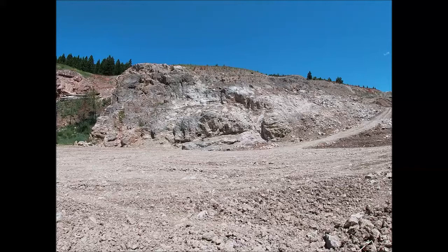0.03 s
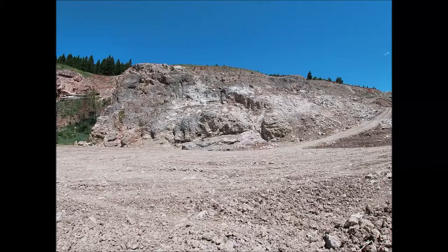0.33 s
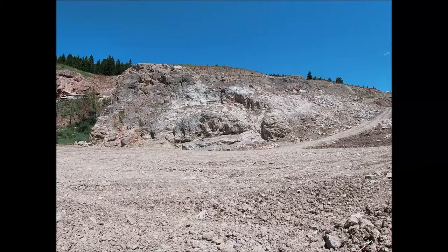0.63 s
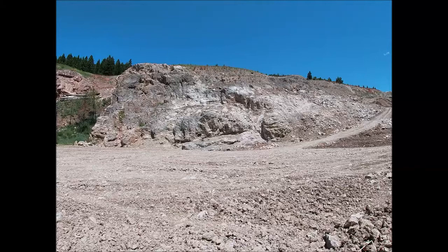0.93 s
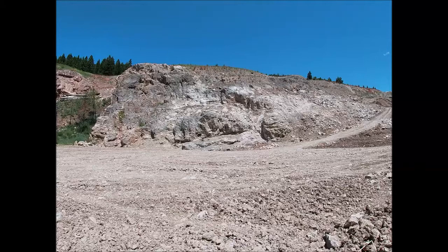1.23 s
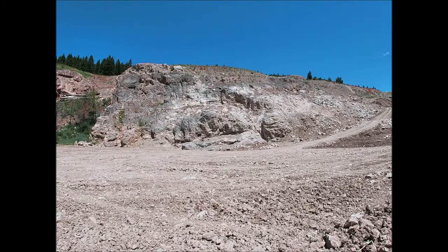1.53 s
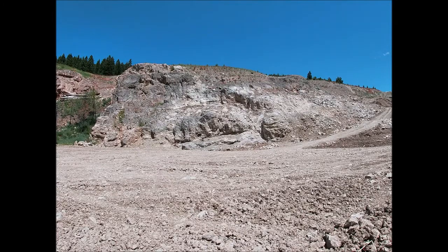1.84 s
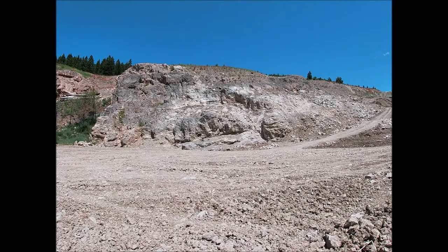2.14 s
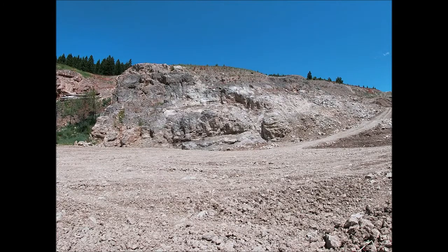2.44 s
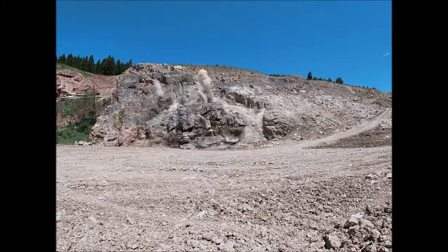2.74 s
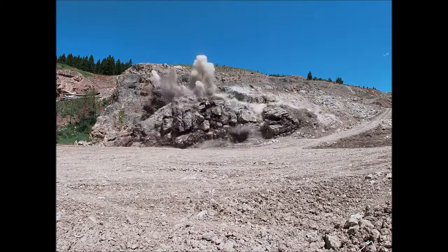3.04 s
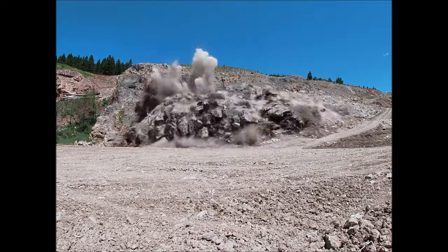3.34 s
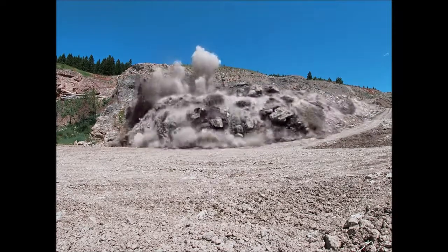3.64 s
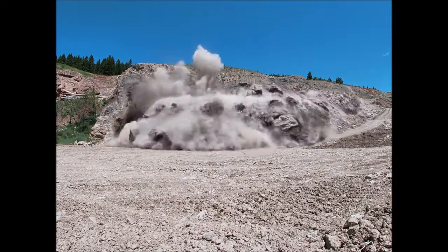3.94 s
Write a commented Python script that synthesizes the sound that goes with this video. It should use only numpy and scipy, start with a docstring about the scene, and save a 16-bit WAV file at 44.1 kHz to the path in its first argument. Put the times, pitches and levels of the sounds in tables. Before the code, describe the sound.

Explosive charges fire in a fast, crackling string across a quarry face, after a quiet stretch of wind on the microphone. Their echoes merge into a roar above a heavy rumble, followed by a growing clatter of falling rock.

```python
"""In an open quarry, wind buffets a microphone over a faint hiss; then a row of charges fires.
Each charge sends out a shock wave, heard as a sharp crack, and escaping gas adds low thumps.
Reflections from the walls merge into a roar. The moving rock mass rumbles on,
while broken stone starts to pour down in a thickening stream of impacts."""
import sys
import numpy as np
from scipy import signal
from scipy.fft import rfft, irfft
from scipy.io import wavfile
from scipy.ndimage import uniform_filter1d

SR = 44100
rng = np.random.default_rng(int(sys.argv[2]) if len(sys.argv) > 2 else 0)


def inscribe(sig):
    """Save sig as 16-bit PCM at rate SR to the path in sys.argv[1].

    A 1-D sig is mono; a 2-D sig holds one channel per row.
    Samples are clipped to [-1, 1] before scaling.
    """
    pcm = np.round(np.clip(np.atleast_2d(sig).T, -1, 1) * 32767)
    wavfile.write(sys.argv[1], SR, pcm.astype(np.int16))


N = 176400
TIME, FREQ_HZ = np.arange(N) / SR, np.fft.rfftfreq(N, 1 / SR)
START_S = .094  # the sound cuts in here


def amp(db):
    """Decibels as an amplitude ratio."""
    return 10 ** (np.asarray(db) / 20)

def unit(x):
    """Normalisation to rms 1."""
    return x / np.sqrt(np.mean(x ** 2) + 1e-20)

def spectrum_db(points, hz):
    """Interpolation of a spectrum on a log-frequency axis."""
    f, db = np.transpose(points)
    return np.interp(np.log(hz + 1), np.log(f + 1), db)

def curve(points, at_s=TIME):
    """Linear interpolation in time."""
    return np.interp(at_s, *np.transpose(points))

def add(mix, start_s, sound):
    """Superposition of a sound on the mix."""
    part = mix[max(round(start_s * SR), 0):][:len(sound)]
    part += sound[:len(part)]

def colour(x, points):
    """Spectral shaping, at rms 1."""
    return unit(irfft(rfft(x) * amp(spectrum_db(points, FREQ_HZ)), N))

def steady(x, span_s):
    """Division by the running rms evens out chance swells."""
    power = uniform_filter1d(x ** 2, int(span_s * SR))
    return x / np.sqrt(abs(power) + 1e-6)

def noise(points):
    """Filtered Gaussian noise."""
    return colour(rng.standard_normal(N), points)

def grains(per_s, spread_db):
    """A Poisson stream of impulses, many small and a few large."""
    size = amp(spread_db * np.minimum(rng.exponential(1, N), 4.5)) * rng.choice([-1, 1], N)
    return unit(size * (rng.random(N) < per_s / SR))


# Spectrum of the hiss. Each row: frequency in Hz, relative level in dB.
HISS_SPECTRUM = [(100, 9), (400, 2), (900, 0.5), (1700, -0.5), (4700, -5.5), (6300, -14), (8500, -14.5),
                 (10200, -16.5), (11300, -36), (16000, -44)]

def hiss(level_db=-46.5):
    """Distant air and trees give stationary broadband noise."""
    return amp(level_db) * noise(HISS_SPECTRUM)


def ring(hz=1175, width_hz=70, level_db=-48.5, fade_db_per_s=32):
    """A faint tone in a narrow band of noise decays exponentially."""
    band = irfft(rfft(rng.standard_normal(N)) / (1 + ((FREQ_HZ - hz) / width_hz) ** 2), N)
    tone = unit(np.sin(2 * np.pi * hz * TIME) + unit(band))
    return amp(level_db - fade_db_per_s * (TIME - START_S)) * tone


# Strength of the wind. Each row: time in seconds, relative level in dB.
WIND_STRENGTH = [(.09, -21), (.2, -20.5), (.38, -19.5), (.56, -23), (.66, -20), (.82, -25), (.96, -32),
                 (1.08, -26), (1.39, -32.5), (1.49, -41), (1.70, -35.5), (1.74, -47), (1.80, -48),
                 (1.85, -30), (2.01, -31.5), (2.05, -41.5), (2.5, -29)]
# Spectra of the large and the small eddies. Each row: frequency in Hz, relative level in dB.
LARGE_EDDY_SPECTRUM = [(10, -1), (30, 3), (70, 2), (120, -4), (200, -14), (350, -42.5), (800, -67),
                       (2000, -86)]
SMALL_EDDY_SPECTRUM = [(30, -32), (100, 1), (180, 3.5), (260, -9.5), (380, -19), (700, -38), (2000, -78)]

def wind():
    """Turbulence at the microphone: small, higher eddies grow faster in a gust than large, deep ones."""
    gust_db = curve(WIND_STRENGTH) + 20  # about 0 in the strongest gusts
    large = amp(-23 + .7 * gust_db) * steady(noise(LARGE_EDDY_SPECTRUM), span_s=.091)
    small = amp(-23.5 + 2.07 * gust_db) * steady(noise(SMALL_EDDY_SPECTRUM), span_s=.034)
    return large + small


# Knocks of air. Each row: centre in seconds, level in dB, half length in seconds, band top in Hz.
WIND_BUFFETS = [(0.33, -22, 0.0087, 344), (0.436, -21.5, 0.0082, 319), (0.88, -31, 0.006, 380),
                (1.432, -29.5, 0.0074, 138), (1.555, -22, 0.011, 70), (1.595, -24.5, 0.0061, 121),
                (1.645, -31, 0.013, 173), (1.944, -30, 0.01, 64)]

def buffets():
    """Each buffet is a brief pressure fluctuation, a dull knock with its own length and pitch band."""
    out = np.zeros(N)
    for centre_s, db, half_s, top_hz in WIND_BUFFETS:
        band = signal.butter(2, [.2 * top_hz, top_hz], "band", fs=SR, output="sos")
        push = np.exp(-((TIME - centre_s) / half_s) ** 2 / 2)
        eddy = push * signal.sosfilt(band, signal.sosfilt(band, rng.standard_normal(N)))
        out += amp(db) * eddy * np.linalg.norm(push) / np.linalg.norm(eddy)
    return out


# Growth of the rockfall. Each row: time in seconds, level of the stones in dB.
FALL_ENVELOPE = [(2.9, -79), (3.3, -48), (3.5, -37), (3.65, -34), (3.85, -29.5), (4.0, -28.5)]
# Spectra of stones and boulders. Each row: frequency in Hz, relative level in dB.
STONE_SPECTRUM = [(60, -12), (170, 11), (350, 5), (700, -0.5), (1500, 2.5), (3000, 0.5), (4700, -4),
                  (5800, -14.5), (8200, -25.5), (10000, -27.5), (11500, -36.5), (14000, -53), (16000, -57)]
BOULDER_SPECTRUM = [(20, -11), (70, 1), (150, 6.5), (260, -7), (500, -20), (1500, -66)]

def rockfall(boulder_db=6.5):
    """Random impacts add up to shot noise: stones clatter and boulders knock dully."""
    stones = colour(grains(per_s=10000, spread_db=1.5), STONE_SPECTRUM)
    boulders = steady(colour(grains(per_s=250, spread_db=3), BOULDER_SPECTRUM), span_s=.063)
    return amp(curve(FALL_ENVELOPE)) * (stones + amp(boulder_db) * boulders)


# Course of the rumble. Each row: time in seconds, level in dB.
RUMBLE_ENVELOPE = [(2.22, -90), (2.3, -35), (2.44, -43), (2.5, -17), (2.75, -20), (2.9, -15), (3.2, -14.5),
                   (3.37, -21), (3.55, -22.5), (3.72, -15.5), (4.0, -19)]
# Its spectrum. Each row: frequency in Hz, relative level in dB.
RUMBLE_SPECTRUM = [(10, -12.5), (28, -0.5), (60, -6), (110, -13.5), (200, -21), (350, -49), (800, -41),
                   (2000, -100)]

def rumble():
    """The moving rock mass radiates low-frequency noise."""
    return amp(curve(RUMBLE_ENVELOPE)) * steady(noise(RUMBLE_SPECTRUM), span_s=.0563)


# Course of the roar. Each row: time in seconds, level in dB.
ROAR_ENVELOPE = [(2.225, -63), (2.24, -45), (2.30, -42), (2.37, -34), (2.43, -33), (2.50, -30.5),
                 (2.56, -21), (2.605, -28.5), (2.65, -26), (2.75, -26), (2.88, -38), (3.0, -36),
                 (3.25, -40), (4.0, -51)]
# Its spectrum. Each row: frequency in Hz, relative level in dB.
ROAR_SPECTRUM = [(60, -4), (300, 1.5), (900, -0.5), (1800, -4.5), (3200, -9.5), (4500, -17), (6000, -22.5),
                 (8000, -38), (9800, -35.5), (11500, -58), (16000, -66)]

def roar():
    """Reverberation: countless small echoes from the quarry walls merge into noise."""
    return amp(curve(ROAR_ENVELOPE)) * colour(grains(per_s=12000, spread_db=3), ROAR_SPECTRUM)


# Bursts of gas. Each row: centre in seconds, relative level in dB, half length in milliseconds.
GAS_BURSTS = [(2.23, -16, 1.18), (2.2631, -16.5, 1.33), (2.2911, -14, 1.16), (2.32, -13.5, 1.14),
              (2.3503, -5.5, 1), (2.445, -17.5, 1.2), (2.4708, -13.5, 1.23), (2.4913, -15, 0.99),
              (2.5005, -13, 3), (2.5739, -2, 2.28), (2.588, -1.5, 1.57), (2.6337, -8, 1.7),
              (2.6716, -3.5, 1.66), (2.704, -3, 2.3), (2.7468, -6.5, 1.44), (2.7965, -6, 3.6),
              (2.829, -10.5, 4), (2.9325, -13, 2.1), (2.9524, -12.5, 3.9), (2.9977, -12, 3.8),
              (3.0334, -11, 3.8), (3.156, -10.5, 2.5), (3.1905, -13.5, 3), (3.203, -10.5, 2.3),
              (3.2338, -10.5, 6.4), (3.2918, -7.5, 2.37), (3.399, -10.5, 4.7), (3.4489, -9, 5.1),
              (3.491, -9, 5.5), (3.6167, -11.5, 5.5)]
# Spectrum of the rushing gas. Each row: frequency in Hz, relative level in dB.
GAS_SPECTRUM = [(100, -12), (300, -14), (600, -2.5), (1200, -19), (3000, -20), (8000, -46), (16000, -84)]

def thumps(pulse_db=.5, edge_db=-9, rush_db=-10.5):
    """Expanding gas radiates a bipolar pulse, a push and then a longer suction, with a rush of noise."""
    suction_ratio, edge_ratio = 1.35, .37  # lengths: suction to push, steep middle to whole pulse
    pulses, rush = np.zeros(N), np.zeros(N)
    t = np.arange(-SR // 40, SR // 40) / SR
    for centre_s, db, half_ms in GAS_BURSTS:
        u = t * 1000 / half_ms  # time in half lengths
        u_body, u_edge = u / suction_ratio ** (np.sign(u) / 2), u / edge_ratio
        body = -u_body * np.exp((1 - u_body ** 2) / 2)
        edge = -u_edge * np.exp((1 - u_edge ** 2) / 2)
        add(pulses, centre_s + t[0], amp(db) * (body + amp(edge_db) * edge))
        add(rush, centre_s + t[0], amp(db) / half_ms * np.exp(-(u + 1) ** 2 / 2))
    return amp(pulse_db) * pulses + amp(rush_db) * rush * noise(GAS_SPECTRUM)


def scatter(decay_s, first_return_s=.0004, cutoff_hz=6240, size=3000):
    """Diffuse scattering: rough rock returns a gritty cloud of duller reflections, with energy 1."""
    t = np.arange(size) / SR
    grit = rng.standard_normal(size) * rng.exponential(1, size)
    cloud = grit * np.exp(-t / decay_s) * (t > first_return_s)
    cloud = signal.lfilter(*signal.butter(1, cutoff_hz, fs=SR), cloud)
    return cloud / np.linalg.norm(cloud)


# Spectrum of one shock. Each row: frequency in Hz, relative level in dB.
SHOCK_SPECTRUM = [(60, -9.5), (400, 0), (1000, 2), (2200, -2), (4400, -13.5), (5500, -20.5), (8200, -30),
                  (9800, -30.5), (11500, -49), (14200, -54), (16000, -81)]

def shock(tilt_db_per_octave, size=2048):
    """A shock wave as a minimum-phase pulse: a pressure spike, then suction, with energy 1."""
    hz = abs(np.fft.fftfreq(size, 1 / SR))
    octaves = np.log2(np.maximum(hz, 500) / 2000)
    log_gain = np.log(amp(spectrum_db(SHOCK_SPECTRUM, hz) + tilt_db_per_octave * octaves))
    spectrum = np.exp(np.conj(signal.hilbert(log_gain)))
    wave = np.fft.ifft(spectrum).real[:size // 2]
    return wave / np.linalg.norm(wave)


# Floor bounce as the firing moves along the face. Each row: time in seconds, delay in seconds.
BOUNCE_DELAY = [(2.23, .00097), (2.9, .0011), (3.2, .00063)]
# Shocks of the charges, plus a few very dull rows (near 2.570 and 3.286 s) that give short low knocks inside
# the thumps. Each row: start in seconds, relative level in dB, tilt in dB per octave.
CHARGES = [(2.2282, 11, 7), (2.261, -9.5, 2), (2.2884, -6, 4), (2.3173, 2, 2), (2.3453, -7, 1),
           (2.3469, 1.5, 3.3), (2.3781, -5, 3.5), (2.382, 3.5, 2.5), (2.4061, 2.5, 0.5), (2.413, 0.5, 5),
           (2.4374, 2, 3), (2.4423, 2.5, 0.5), (2.4671, 2.5, 1.5), (2.4679, -9, -15), (2.4739, -3, 0.4),
           (2.4984, -3, 3), (2.503, 0.5, -1), (2.5277, -1, 0.5), (2.541, -1.5, 1), (2.5547, 0, 0.5),
           (2.5700, 4, -11), (2.5853, -3.5, -3), (2.628, 2.5, -0.5), (2.6677, 4.5, -9.5), (2.6975, -5, 1),
           (2.7147, -1, 0), (2.727, 1, 1), (2.7592, 0.5, 0), (2.7933, -0.5, 0.5), (2.8269, -2.5, 0.5),
           (2.8567, 0, 1), (2.8796, -5, 0.5), (2.8829, -10.5, 7.5), (2.9037, 0, -1.5), (2.9097, -3.5, 2.5),
           (2.942, -6, 1.2), (2.9638, -6, 1), (2.9743, -9.5, 2), (2.995, -4.5, -0.2), (3.0135, -8.5, -2.5),
           (3.0485, -9, 2), (3.081, -6.5, 1.3), (3.091, -10.5, 1.5), (3.11, -5, -3), (3.144, -5, 0),
           (3.231, -0.5, 2), (3.2859, -4, -11)]

def cracks(gain_db=5, rubble_db=-9, face_db=-10.5, bounce_gain=.5):
    """Multipath: each shock arrives directly, scattered by rubble and rock face, and off the floor."""
    out = np.zeros(N)
    for start_s, db, tilt in CHARGES:
        paths = amp(rubble_db) * scatter(decay_s=.0011) + amp(face_db) * scatter(decay_s=.0034)
        paths[0] += 1  # direct path
        delay_s = curve(BOUNCE_DELAY, start_s) * rng.uniform(.94, 1.06)
        paths[int(delay_s * SR)] += bounce_gain  # comb filtering makes the crack hollow
        crack = signal.fftconvolve(shock(tilt), paths)
        add(out, start_s, amp(db) * crack / np.linalg.norm(crack))
    return amp(gain_db) * out


def scene():
    """Wind, blast and rockfall superpose at one microphone."""
    background = wind() + buffets() + ring() + hiss()
    blast = cracks() + thumps()
    fired = TIME > CHARGES[0][0]
    aftermath = (roar() + rumble()) * fired + rockfall()
    return (background + blast + aftermath)[None]

def record(dry, limit_db=-12.5, share_removed=.37, recovery_db_per_s=3, ceiling=.97, top_hz=16300):
    """Compression ducks the level after the loudest moments; clipping and a low-pass filter follow."""
    power = signal.lfilter(*signal.butter(1, 15, fs=SR), dry[0] ** 2)
    level_db = 10 * np.log10(abs(power) + 1e-12)
    recovery_db = TIME * recovery_db_per_s
    held_db = np.maximum.accumulate(level_db + recovery_db) - recovery_db
    gain = amp(-share_removed * np.maximum(held_db - limit_db, 0))
    opening = np.clip((TIME - START_S) / .002, 0, 1)
    clipped = np.clip(dry * opening * gain, -ceiling, ceiling)
    lowpass = signal.firwin(511, top_hz, window=("kaiser", 9), fs=SR)
    return signal.oaconvolve(clipped, lowpass[None], "same")


dry = scene()
out = record(dry)
inscribe(out)
```